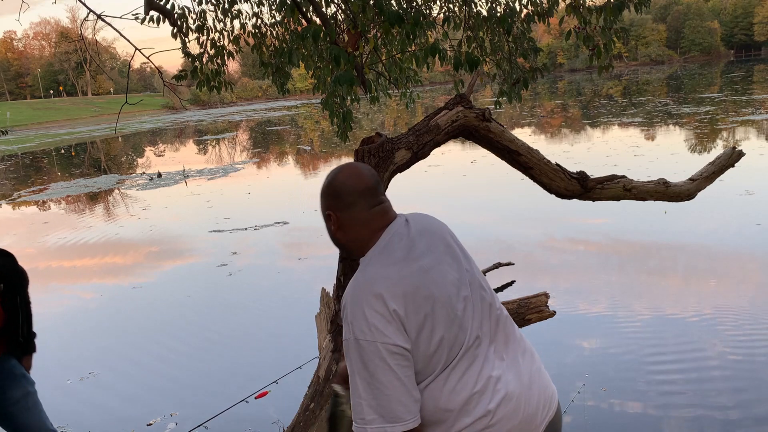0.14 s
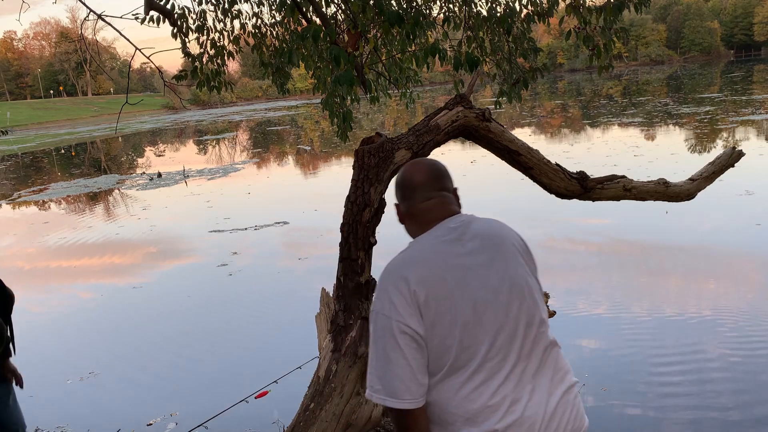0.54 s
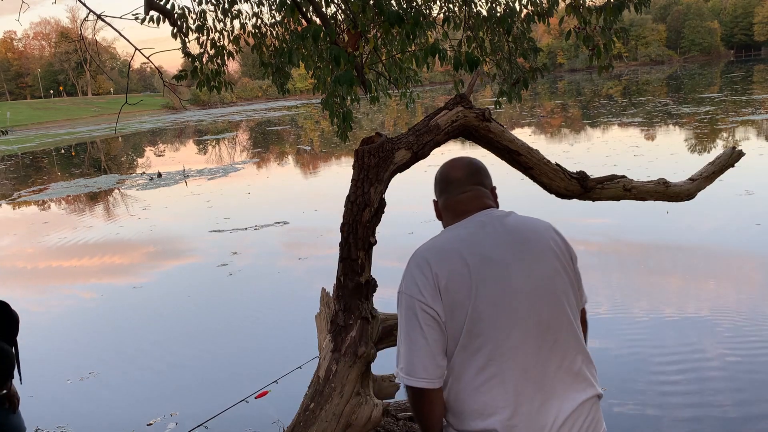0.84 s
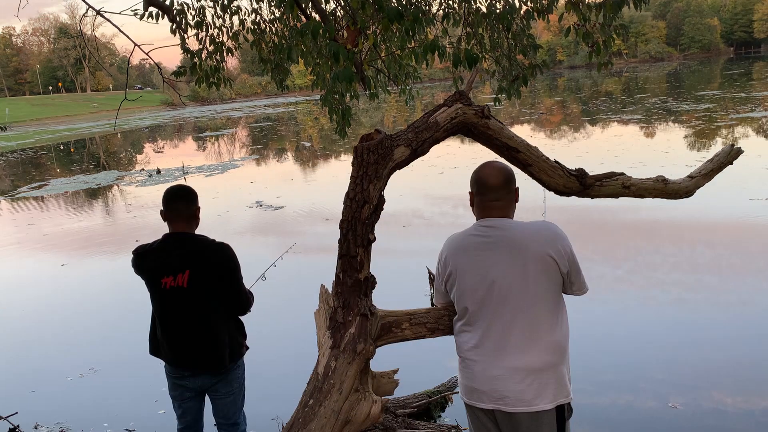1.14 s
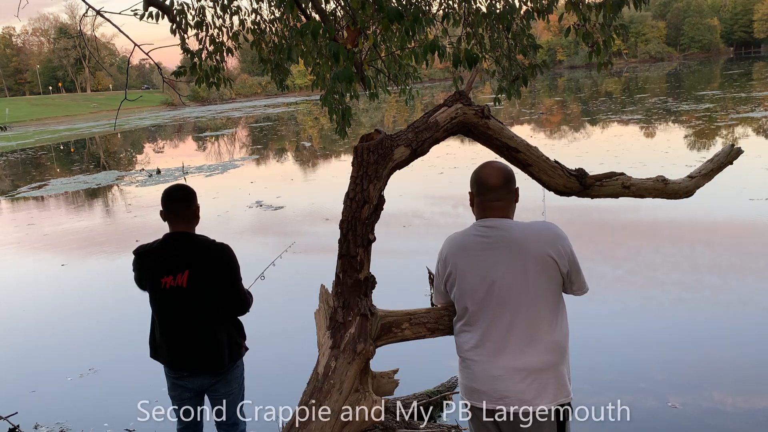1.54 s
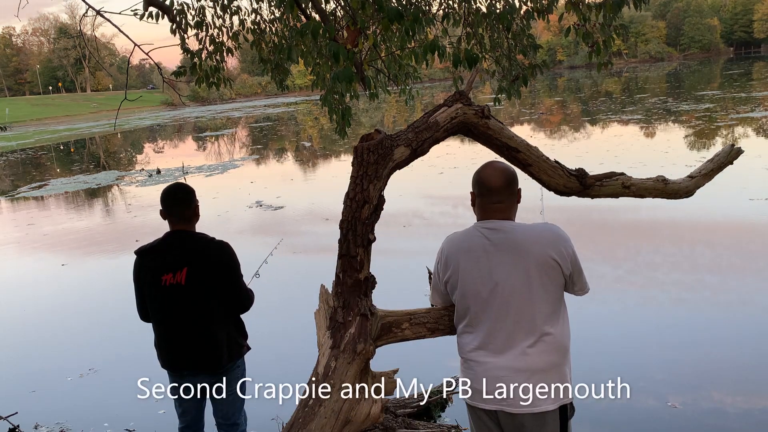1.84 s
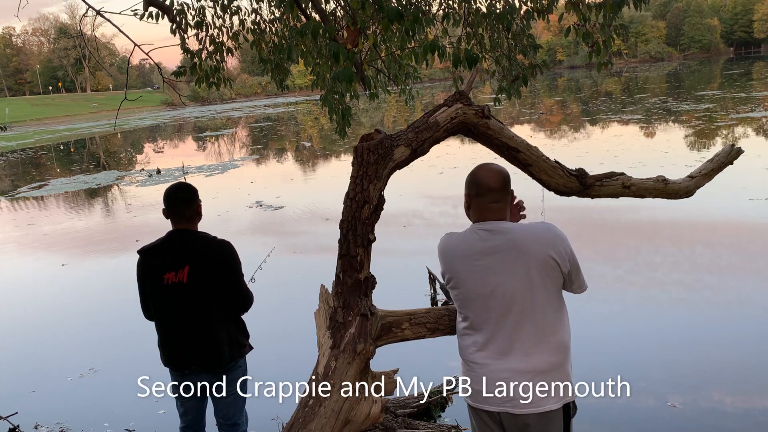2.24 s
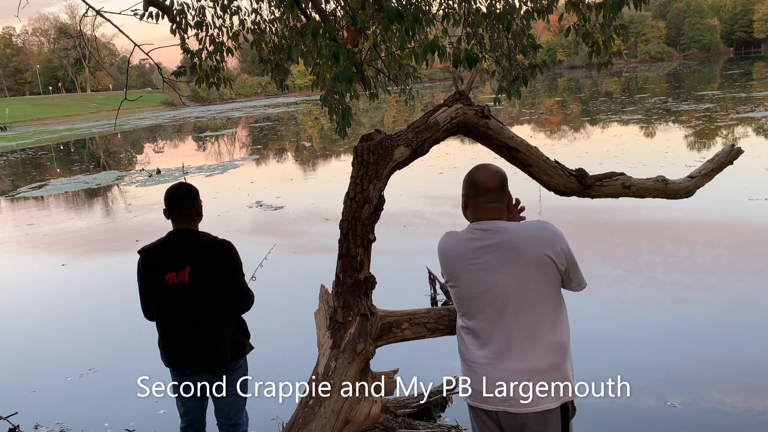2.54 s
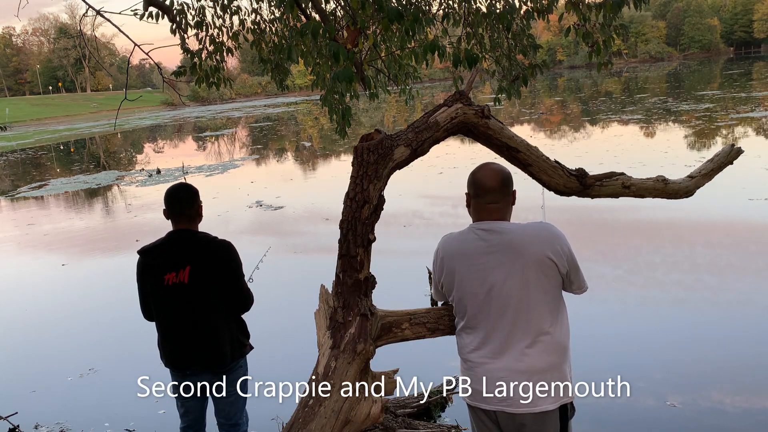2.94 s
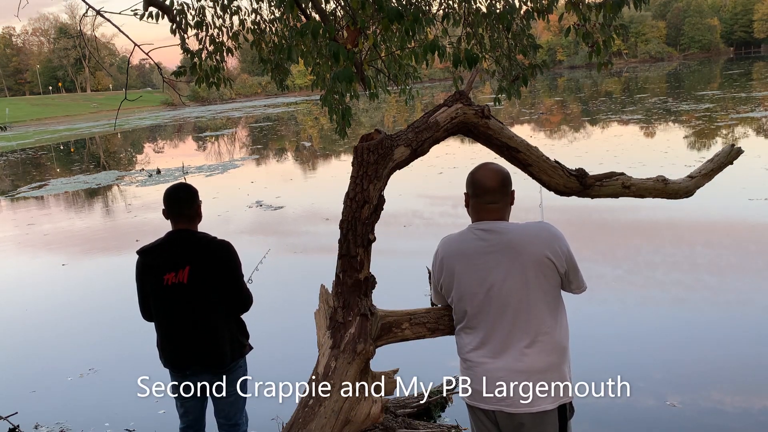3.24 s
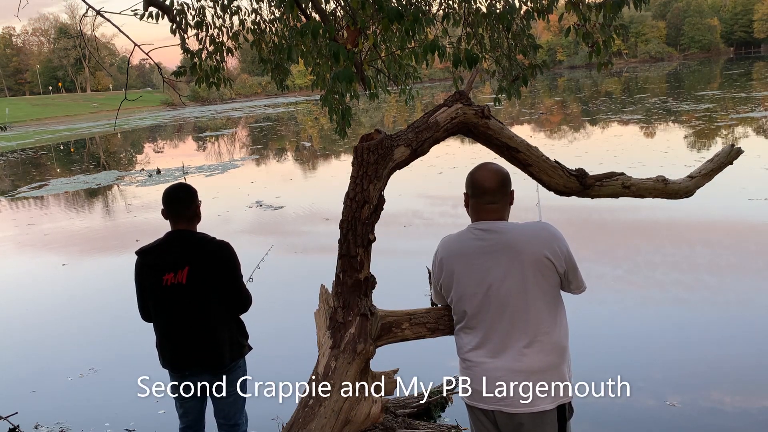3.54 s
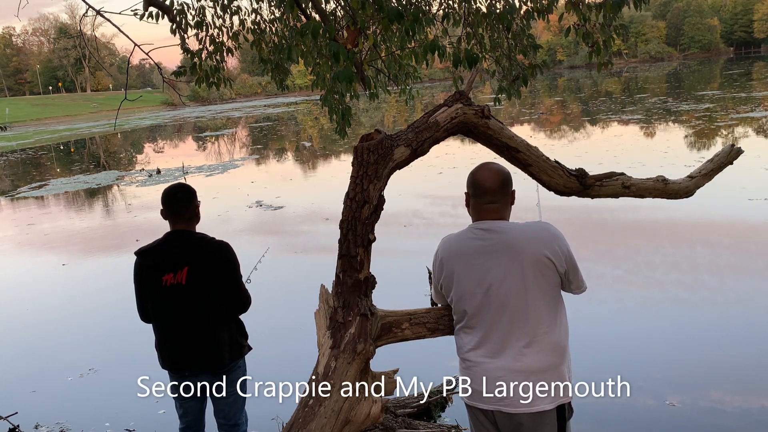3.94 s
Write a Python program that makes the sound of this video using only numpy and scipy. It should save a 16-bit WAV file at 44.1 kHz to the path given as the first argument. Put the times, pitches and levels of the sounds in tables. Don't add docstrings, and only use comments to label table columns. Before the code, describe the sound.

A shimmering chorus of high cricket trills over a soft constant rumble, broken by one momentary dip to silence near one second.

```python
import sys
import numpy as np
from scipy import signal
from scipy.fft import rfft, irfft
from scipy.io import wavfile
from scipy.ndimage import uniform_filter1d

SR = 44100
rng = np.random.default_rng(int(sys.argv[2]) if len(sys.argv) > 2 else 0)


def master(y):
    cut = np.clip(np.atleast_2d(y).T, -1, 1)
    pcm = np.round(cut * 32767)
    wavfile.write(sys.argv[1], SR, pcm.astype(np.int16))


def decibels_to_gain(level_db):
    exponent = np.asarray(level_db, float) / 20
    return 10 ** exponent


N = 180060
T = np.arange(N) / SR
LEFT_RIGHT = np.array([[1], [-1]])
CUT_S = 1.017

SINGERS = {"bright": (81.4, -2, -24, -20, 1.82), "limping": (69.8, -11, -35, -32, -.15),
           "swelling": (71.4, -8, -34, -30, .45), "plain": (78, -3, -27, -30, -1.4),
           "high": (69, -2, -30, -35, 1.3), "reedy": (72, -3.5, -21, -21, 1.5),
           "nasal": (73, -3, -17, -27, .5), "buzzy": (72, -10, -15, -18, -2.2),
           "soft": (70, -4, -27, -33, .5)}
# singer, start_s, length_s, pitch_hz, level_db
TRILLS = [("high", 0.0, .24, 4540, -63), ("plain", 0.0, .07, 4350, -64), ("high", .85, .14, 4540, -65.5),
          ("bright", 1.033, .227, 4350, -58), ("high", 1.035, .125, 4580, -65),
          ("soft", 1.30, .26, 5010, -81), ("soft", 1.41, .37, 4030, -63), ("reedy", 1.53, .4, 4120, -66.5),
          ("buzzy", 1.618, .232, 4400, -65.5), ("soft", 1.66, .29, 3790, -71),
          ("nasal", 1.92, .18, 4110, -67), ("limping", 2.2545, .426, 3935, -55),
          ("limping", 2.269, .42, 3700, -71), ("nasal", 2.50, .26, 4200, -68),
          ("plain", 2.64, .28, 4350, -59), ("high", 2.86, .23, 4570, -64), ("nasal", 2.92, .22, 4170, -68),
          ("soft", 2.98, .3, 5000, -82), ("swelling", 3.064, .336, 3945, -62.5),
          ("reedy", 3.50, .35, 4130, -66.5), ("bright", 3.546, .284, 4350, -62),
          ("plain", 3.85, .25, 4265, -59.5)]
# start_s, pitch_hz, level_db
CHIRPS = [
    (.198, 3870, -64),
    (.806, 3690, -70),
    (.917, 3710, -68),
]
SWELL_DB = {"high": -2, "bright": 1, "soft": 1, "reedy": 1.5, "nasal": 3, "swelling": 6}
# time_s, level_db, loudest_pitch_hz
CROWD = [
    [(0.0, -58, 4200), (0.47, -58.8, 4330), (0.89, -60, 4200), (0.98, -59, 4300)],
    [(1.05, -58, 4300), (1.16, -60.5, 4280), (1.63, -57.5, 4120), (2.03, -60, 4240), (2.31, -59, 4280),
     (2.9, -58.5, 4290), (3.16, -60, 4150), (3.49, -58.5, 4240), (4.08, -57.5, 4200)],
]
# peak_s, fine_db, coarse_minus_fine_db, rise_s, fall_s
RUBS = [(.05, -62, -2, .09, .11), (.21, -85, 5, .03, .04), (.29, -91, 6, .08, .15), (.47, -85, 5, .1, .12),
        (.575, -85, 7, .12, .12), (.655, -77, -8, .05, .07), (.9, -87, 6, .45, .2),
        (.99, -84, 5, .06, .015), (1.57, -88, 3, .1, .2), (1.66, -87, 2, .04, .15), (1.78, -87, 3, .1, .2),
        (4.05, -87.5, 0.5, .07, .04), (4.085, -80, 2, .015, .02)]
# peak_s, peak_db, t60_s, lowest_hz
TICKS = [
    (.212, -64, .07, 9500),
    (.2845, -61, .018, 5500),
    (.988, -65, .09, 9500),
]
# frequency_hz, density_db (per Hz)
ROAD = [(12, -30), (20, -29.5), (54, 1), (86, -0.5), (109, -4), (208, -17), (306, -21.5), (372, -27),
        (513, -27.5), (755, -25), (1240, -33), (1820, -37.5), (2930, -54.5), (3400, -53.5), (4420, -72),
        (7480, -120)]
# frequency_hz, side_minus_mid_db
ROAD_SIDE = [(40, -25.5), (150, -19.5), (300, -16), (600, -5), (1300, -5), (3000, 0)]
# frequency_hz, left_minus_right_db
ROAD_LEAN = [(60, -1), (110, -1), (200, 0.5), (380, -0.5), (700, 1), (1290, 1.5), (2380, -2.5), (4400, -6),
             (8120, -5), (15000, -1)]
# frequency_hz, left_lead_rad
ROAD_LEAD = [(40, 0.37), (150, 0.18), (400, 0.3), (700, -0.79), (3000, 0.48)]
# frequency_hz, density_db (per Hz)
AIR = [(1500, -36), (2800, -13.5), (5400, 1.5), (7000, -3.5), (9000, -4), (12500, -1), (14000, -6.5),
       (15500, -7.5)]
# start_s, end_s
DULL_MOMENTS = [
    (1.035, 1.185),
    (3.58, 3.825),
]
# low_hz, high_hz, dropped_share
GAPPED_BANDS = [(3350, 3550, .3), (5200, 5550, .75), (5550, 5900, .7), (5900, 6250, .45), (6250, 6600, .15),
                (14900, 15250, .3), (15250, 15800, .7)]


def level(x, db):
    return x * decibels_to_gain(db) / np.sqrt(np.mean(x ** 2))


def on_log_axis(table, hz):
    f, v = np.transpose(table)
    return np.interp(np.log(hz), np.log(f), v)


def band(x, lo_hz, hi_hz, order=3):
    sos = signal.butter(order, [lo_hz, min(hi_hz, .45 * SR)], "band", fs=SR, output="sos")
    return signal.sosfilt(sos, x)


def zero_phase(x, hz, kind, order=2):
    return signal.sosfiltfilt(signal.butter(order, hz, kind, fs=SR, output="sos"), x)


def walk(rate):
    k = int(SR / rate)
    held = np.repeat(rng.standard_normal(N // k + 1), k)
    return 1.3 * uniform_filter1d(uniform_filter1d(held, k), k)[:N]


def wing(t, hz, rate, weak_db, second_db, third_db, lead):
    fall_hz, stroke_share, scatter_db, jitter_hz = 160, .97, 1, 10
    strokes = np.cumsum(rate * np.ones_like(t)) / SR
    index = strokes.astype(int)
    part = np.minimum(strokes % 1 / stroke_share, 1)
    stroke_db = scatter_db * rng.standard_normal(500)[index] + weak_db * (index % 2)
    size = decibels_to_gain(stroke_db) * np.sin(np.pi * part ** 1.12)
    pitch_hz = hz + jitter_hz * rng.standard_normal(500)[index] - fall_hz * part ** 3
    turn = 2 * np.pi * np.cumsum(pitch_hz) / SR + np.array([[lead], [0]])
    partials = np.sin(turn) + decibels_to_gain(second_db) * np.sin(2 * turn) + decibels_to_gain(third_db) * np.sin(3 * turn)
    return 2 * size * partials


def near_crickets():
    rise_hz_per_db, pan_db, chirp_s, release_s = 8, 2.8, .018, 0.0019
    out = np.zeros((2, N))
    chirps = [("soft", s, chirp_s, hz, db) for s, hz, db in CHIRPS]
    for singer, start, length, hz, db in list(TRILLS) + chirps:
        span = slice(max(int(start * SR), 0), min(int((start + length) * SR), N))
        t = T[span]
        swell_db = SWELL_DB.get(singer, 0) * (t - start) / length
        song = wing(t, hz + rise_hz_per_db * swell_db, *SINGERS[singer])
        release = np.minimum((t[-1] - t) / release_s, 1)
        out[:, span] += decibels_to_gain(db + swell_db + pan_db * LEFT_RIGHT / 2) * song * release
    return out


def crowd(count=30):
    spread_hz, stragglers_db, pan_db = 290, -28.5, 4
    weak_db, second_db, third_db = -6.5, -26, -31.5
    s, db, loudest_hz = np.transpose(np.concatenate(CROWD))
    centre_hz = np.interp(T, s, loudest_hz)
    out = np.zeros((2, N))
    for hz in np.linspace(3740, 5150, count):
        pace, place = rng.random(2)
        rate = 66 + 18 * pace + 1.5 * walk(5)
        song = wing(T, hz + 60 * walk(6), rate, weak_db, second_db, third_db, 2 * np.pi * place)
        share = np.exp(-.5 * ((hz - centre_hz) / spread_hz) ** 2) + decibels_to_gain(stragglers_db)
        active = share * decibels_to_gain(3.5 * walk(6))
        out += np.roll(song, int(place * N), axis=1) * active
    out /= np.sqrt(uniform_filter1d(out ** 2, SR // 4))
    return out * decibels_to_gain(np.interp(T, s, db) + pan_db * LEFT_RIGHT / 2)


def banks(x, tail_db):
    t60_s, onset_s = .2, 0.0048
    t = T[:SR // 3]
    decay = np.exp(-np.log(1000) * t / t60_s) * np.minimum(t / onset_s, 1)
    tail = rng.standard_normal((2, len(t))) * decay
    tail *= decibels_to_gain(tail_db) / np.sqrt(np.sum(tail ** 2, axis=1, keepdims=True))
    return x + signal.fftconvolve(x, tail, axes=1)[:, :N]


def rustle():
    edge_db = -20
    grain_db = 3.0 * np.minimum(rng.exponential(size=N), 4)
    grains = rng.standard_normal(N) * decibels_to_gain(grain_db) * decibels_to_gain(2.0 * walk(70))
    fine = level(band(grains, 6350, 14300, order=2), 3.3)
    coarse = level(band(grains, 2670, 9240, order=2), 4.0)
    out = np.zeros(N)
    for s, fine_db, coarse_db, rise, fall in RUBS:
        away = np.abs(T - s) / np.where(T < s, rise, fall)
        out += decibels_to_gain(fine_db + edge_db * away) * (fine + decibels_to_gain(coarse_db) * coarse)
    for s, db, t60, low_hz in TICKS:
        ring = np.exp(-np.log(1000) * np.abs(T - s) / np.where(T < s, t60 / 2, t60))
        out += decibels_to_gain(db) * ring * level(band(rng.standard_normal(N), low_hz, 15500, order=2), -11)
    near_echo = decibels_to_gain(-3) * LEFT_RIGHT * np.roll(out, 90)
    return out * decibels_to_gain(np.array([[.4], [-.5]])) + near_echo


def coloured(spectrum, side_db, lean_db, lead):
    hz = np.maximum(np.arange(N // 2 + 1) * SR / N, 1)
    mid, side = rfft(rng.standard_normal((2, N))) * decibels_to_gain(on_log_axis(spectrum, hz))
    side = side * decibels_to_gain(on_log_axis(side_db, hz))
    lean = decibels_to_gain(LEFT_RIGHT * on_log_axis(lean_db, hz) / 2)
    phase = np.exp(.5j * LEFT_RIGHT * on_log_axis(lead, hz))
    return irfft((mid + LEFT_RIGHT * side) * lean * phase, N)


def hump(peak_s, width_s=0.051):
    return np.exp(-.5 * ((T - peak_s) / width_s) ** 2)


def road():
    rumble_db = -45.5 + 2 * hump(1.45) - 3.6 * hump(1.8)
    wash_db = -60 - 3 * (T < CUT_S)
    noise = coloured(ROAD, ROAD_SIDE, ROAD_LEAN, ROAD_LEAD)
    noise = zero_phase(noise, 28, "high")
    low = zero_phase(noise, 300, "low")
    rumble = level(low, 0.86) * decibels_to_gain(rumble_db + 0.75 * walk(5.59))
    wash = level(noise - low, 1.12) * decibels_to_gain(wash_db + 1.02 * walk(5.16))
    return rumble + wash


def air():
    side_db = [(3000, 18.5), (7000, -15.5), (12000, -36.0)]
    lean_db = [(6000, 0.76), (12000, 0.17)]
    hiss = coloured(AIR, side_db, lean_db, [(100, 0.0097)])
    return level(hiss, -79) * decibels_to_gain(.7 * walk(10))


def scene():
    near = decibels_to_gain(.5) * banks(near_crickets(), -13)
    far = banks(crowd(), -13)
    return near + far + rustle() + road() + air()


def thin_treble(x):
    dull = sum((T > a) & (T < b) for a, b in DULL_MOMENTS)
    sos = signal.ellip(6, .1, 40, 13400, "high", fs=SR, output="sos")
    return x - uniform_filter1d(1. * dull, 400) * signal.sosfiltfilt(sos, x)


def drop_faint_bands(x):
    draws = uniform_filter1d(rng.random(N // 1024 + 1), 2)
    chance = np.repeat(draws, 1024)[:N]
    spectrum, hz = rfft(x), np.arange(N // 2 + 1) * SR / N
    for lo_hz, hi_hz, share in GAPPED_BANDS:
        part = irfft(spectrum * ((hz >= lo_hz) & (hz < hi_hz)), N)
        power = uniform_filter1d(part[0] ** 2, 4096)
        dropped = (power < 1.6 * np.median(power)) & (chance < .15 + .7 * share)
        x = x - uniform_filter1d(1. * dropped, 500) * part
    return x


def low_pass(x):
    return signal.sosfilt(signal.butter(12, 15630, fs=SR, output="sos"), x)


def record(dry):
    fade_s, floor, bend = 0.039, 0.0078, 1.46
    fade = np.minimum(np.abs(T - CUT_S) / fade_s + floor, 1) ** bend
    mix = drop_faint_bands(thin_treble(dry * fade))
    return low_pass(mix)


dry = scene()
out = record(dry)
master(out)
```